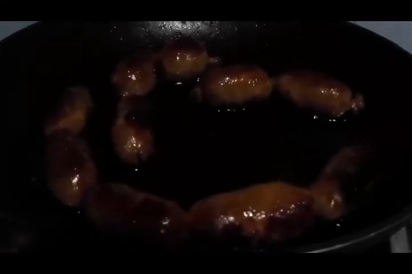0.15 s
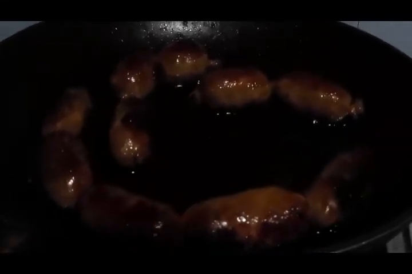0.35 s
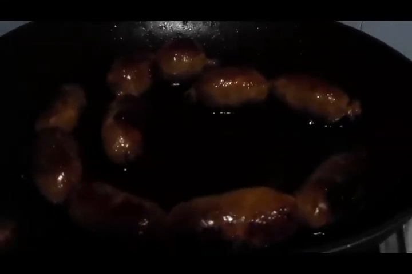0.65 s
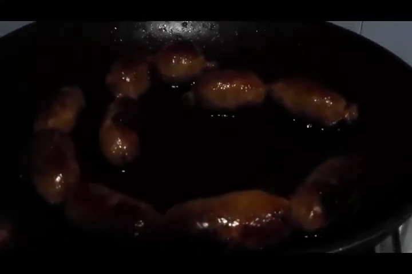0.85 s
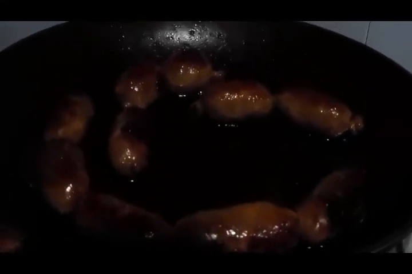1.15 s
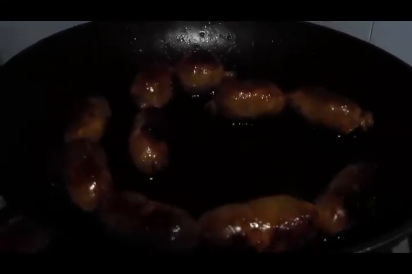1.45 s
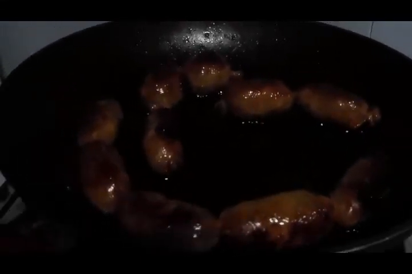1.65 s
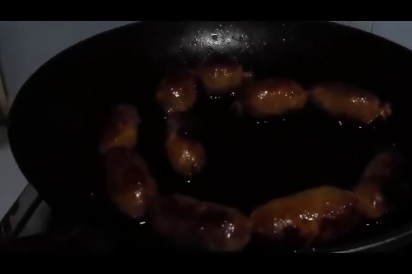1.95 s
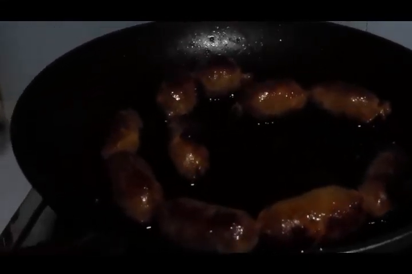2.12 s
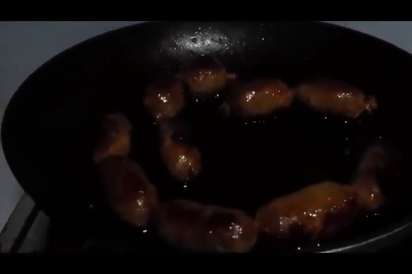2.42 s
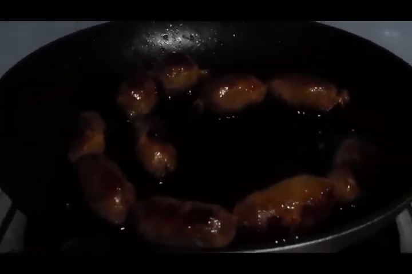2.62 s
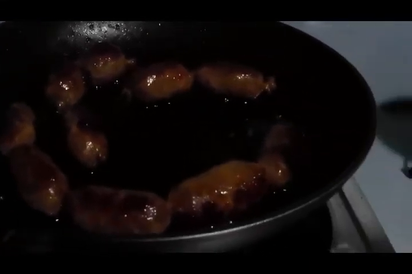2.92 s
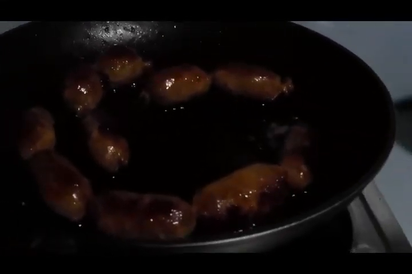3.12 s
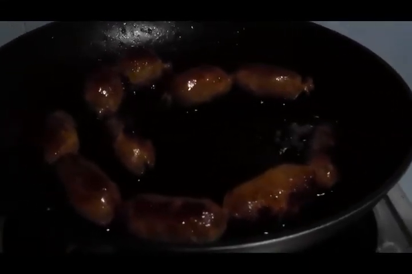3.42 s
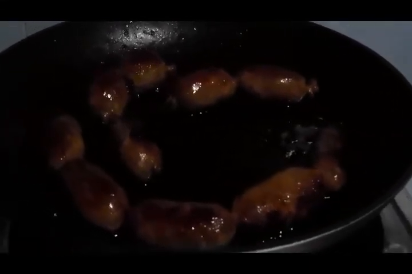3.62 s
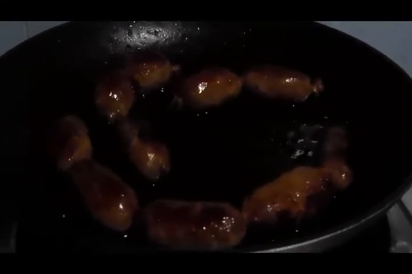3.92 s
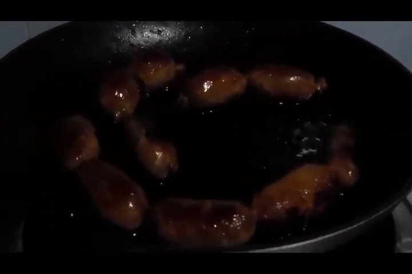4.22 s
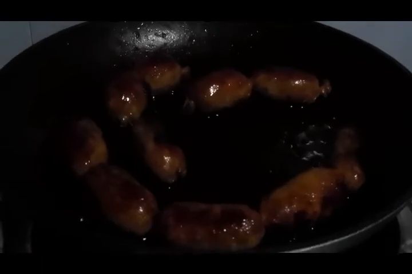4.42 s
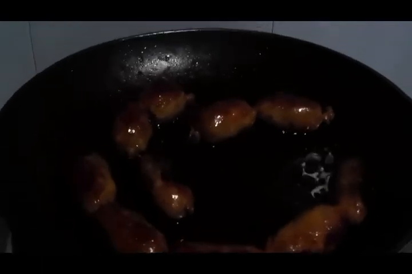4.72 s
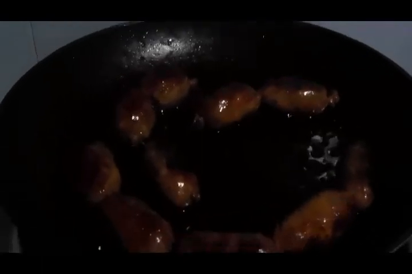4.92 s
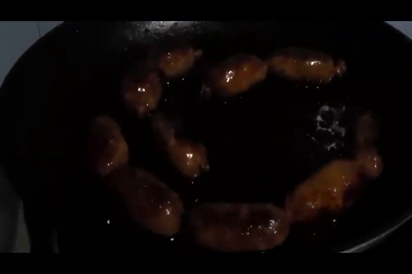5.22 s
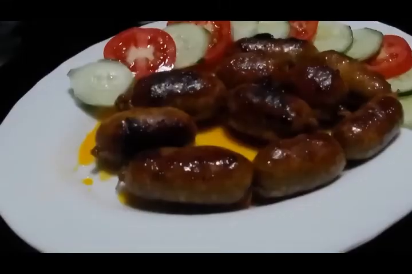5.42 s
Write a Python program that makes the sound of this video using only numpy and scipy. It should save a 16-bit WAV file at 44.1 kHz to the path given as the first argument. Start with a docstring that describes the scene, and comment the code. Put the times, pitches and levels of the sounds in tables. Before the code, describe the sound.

Close, bright frying sizzle with snapping fat and a few dull bumps, stopping dead near the end and leaving only faint room noise.

```python
"""Close to a camera microphone in a small tiled kitchen, sausages fry from the start in a film of fat.
Steam bubbles burst as sharp pops, lesser pops, dense crackle and fine fizz; a few big ones plop; a burner rushes.
Dull bumps and scuffs sound nearby in the first second, and again from about 3 to 5 s. They are shaped noise.
At 5.3 s the frying, the bumps and the burner stop at once, leaving only the quiet room, a hush of coloured noise."""
import sys
import numpy as np
from scipy import signal
from scipy.fft import rfft, irfft, next_fast_len
from scipy.io import wavfile
from scipy.ndimage import map_coordinates

SR = 44100
rng = np.random.default_rng(int(sys.argv[2]) if len(sys.argv) > 2 else 0)


def dump_mix(stems):
    """Bounce the given channels to the path in sys.argv[1] as a 16-bit WAV at rate SR."""
    frames = np.atleast_2d(stems).T  # one column per channel
    limited = np.clip(frames, -1, 1)  # hard clip at full scale
    pcm = np.round(limited * 32767).astype(np.int16)
    wavfile.write(sys.argv[1], SR, pcm)


N = 245195
STOP_S = 5.319  # all but the room's hush ends here

# How hard the fat boils, before the random flicker: start_s, coarse_bubbles_db, fine_spray_db
BOIL = [(0.0, -54.5, -55.5), (0.81, -49, -57.5), (1.08, -55.5, -57.5), (1.39, -52, -57),
        (1.71, -51.5, -53.5), (2.64, -51.5, -55), (2.94, -53, -53), (3.15, -49.5, -54.5),
        (3.31, -53, -59.5), (3.87, -53.5, -58.5), (4.25, -50.5, -56.5), (4.63, -53.5, -58),
        (4.94, -50.5, -59), (5.13, -52.5, -60), (5.17, -54.5, -54), (5.26, -49, -55.5)]
# Colour of the coarse crackle: frequency_hz, level_db
CRACKLE_COLOUR = [(300, -30), (700, -2), (1500, -12.5), (2200, -13), (3600, -8.5), (4500, 1), (6000, 4.5),
                  (7400, 7), (8500, 1), (11000, 6.5), (16000, -69)]
# Colour of the fine spray: frequency_hz, level_db
SPRAY_COLOUR = [(2000, -31), (5000, -23), (7400, -14), (8800, -17.5), (10500, -9.5), (11500, -12),
                (13000, -18.5), (15500, -20.5)]

# The loudest bursts, before filtering and the room: start_s, snap_peak_db, snap_pitch_hz, tail_db
# (tail_db is the common level that the ring and the spatter are set against)
LOUD_POPS = [(.0906, -22, 6700, -48), (.211, -16, 5900, -39), (.3798, -32.5, 4170, -46),
             (.4337, -26, 5640, -39), (.4536, -30, 9890, -35.5), (.6434, -20, 9800, -53),
             (.9163, -26.5, 7500, -37), (1.036, -27, 9450, -31), (1.0939, -19.5, 9200, -34.5),
             (1.4747, -25.5, 5200, -37), (1.6777, -29, 4870, -34), (1.6808, -25, 4230, -37),
             (1.6936, -32, 2730, -41), (1.7055, -35, 5430, -34.5), (1.825, -17, 8800, -35),
             (1.9231, -23.5, 6100, -33), (2.0623, -31, 3940, -37), (2.104, -29.5, 4370, -42),
             (2.4195, -28, 4660, -40), (2.4246, -17, 7800, -33.5), (2.5621, -23, 9300, -50),
             (2.5858, -30, 3450, -34), (2.802, -32, 3250, -45), (2.9024, -29, 4970, -31.5),
             (3.0422, -30, 7200, -37), (3.1087, -25, 6160, -33.5), (3.2683, -24, 5160, -41),
             (3.312, -21, 6560, -40), (3.3375, -17, 5640, -31), (3.503, -22, 6900, -41),
             (3.5098, -22, 6260, -33.5), (3.5716, -20.5, 9660, -47), (3.6844, -19.5, 10800, -43),
             (4.0897, -25.5, 4700, -49), (4.1021, -27.5, 3380, -35), (4.2215, -14.5, 8800, -41),
             (4.2936, -19.5, 11200, -52), (4.4371, -12, 10200, -28), (4.487, -25.5, 5200, -36),
             (4.5138, -19.5, 7260, -30.5), (4.599, -25, 7600, -53), (4.7529, -26.5, 4670, -35),
             (4.7743, -34.5, 4100, -34), (4.9818, -22, 4960, -36.5), (5.0558, -21, 7600, -34),
             (5.1466, -23, 8530, -36), (5.1819, -23, 5510, -33), (5.2112, -24.5, 6890, -31),
             (5.2346, -14, 10500, -32), (5.265, -25, 5870, -43)]
# Colour of the droplets spattering after a pop: frequency_hz, level_db
DROPLET_COLOUR = [(300, -33), (1500, -5.5), (4500, 4.5), (7500, -8.5), (11000, 6.0), (15000, -22)]
# The lesser pops come by chance, around these typical values
LESSER_SNAP_DB, LESSER_SNAP_SCATTER_DB = -30.5, 3
LESSER_PITCH_HZ, LESSER_PITCH_SCATTER_OCTAVES = 6890, 0.353
LESSER_TAIL_DB, LESSER_TAIL_SCATTER_DB = -43.5, 3
# Smaller, higher bubbles snap harder and ring less
SNAP_DB_PER_OCTAVE, TAIL_DB_PER_OCTAVE = 6.5, -5

# Big slow bubbles in the fat, before their onset and the room: start_s, level_db, pitch_hz, t60_s
BIG_BUBBLES = [(1.6926, -40, 1260, 0.013), (2.568, -44.5, 647, 0.053), (4.0888, -40.5, 1450, 0.052),
               (4.8892, -36.5, 1320, 0.01)]
# Colour of their puff of steam: multiple_of_pitch, level_db
PUFF_COLOUR = [(1 / 8, -36), (1 / 2, -3), (1, 0), (2, -7), (6, -35)]

# Dull bumps and scuffs nearby, before their rise and fall: start_s, level_db, rise_s, t60_s, centre_hz
CONTACTS = [(.41, -59.5, .08, 0.69, 216), (.775, -59.5, 0.046, 0.48, 300), (.926, -50, 0.013, 0.26, 570),
            (1.04, -48, 0.0068, 0.45, 475), (1.059, -49, 0.008, 0.28, 298), (3.09, -66, 0.015, 0.53, 252),
            (3.96, -64, 0.023, 1, 272), (4.501, -58.5, 0.0088, 0.18, 400), (4.86, -56.5, 0.1, 0.67, 815)]
# Colour of a bump: multiple_of_centre, level_db
CONTACT_COLOUR = [(.08, -32), (.25, -14), (.55, -2), (1, -1.5), (1.6, -2), (3, -9.5), (6, -12), (20, -61)]
# Resonances of stove and room: centre_hz, width_hz, gain_db
STOVE_RESONANCES = [(304, 16, 10.5), (417, 41, 6.5), (581, 27, 5), (1135, 12, 9)]
# Colour of the burner: frequency_hz, level_db
BURNER_COLOUR = [(40, -20), (110, -10.5), (200, -12), (300, -7.0),
                 (600, -3.5), (1200, -6), (3000, -5.5), (10000, -63)]

# Decay of the room tail: frequency_hz, t60_s
ROOM_DECAY = [(300, 0.22), (3000, 0.34), (8000, 0.14), (15000, 0.013)]
# Colour of the room by itself: frequency_hz, level_db
ROOM_COLOUR = [(25, -29), (60, -27), (85, -9.5), (110, -2.5), (160, -4.5), (280, -0.5), (700, 0),
               (1150, -1), (2000, -3.5), (5000, -8.5), (11000, -14.5), (15500, -14)]
# Response of the camera's microphone: frequency_hz, gain_db
MICROPHONE = [(1000, -1), (11000, -0.5), (13000, 1), (15500, -1.5)]
MICROPHONE_TOP_HZ = 15900


def amp(db):
    """Decibels to gain."""
    return 10 ** (np.asarray(db) / 20)


def unit(x):
    """Scale to rms 1."""
    return x / np.sqrt(np.mean(x ** 2) + 1e-20)


def along(points, hz):
    """Read (frequency, value) points on a log frequency axis."""
    f, v = np.transpose(points)
    return np.interp(np.log(hz + 1), np.log(f + 1), v)


def wobble(rate):
    """A smooth random curve of rms 1, with rate knots a second."""
    knots = rng.standard_normal(N // 50)
    return unit(map_coordinates(knots, [np.arange(N) * rate / SR]))


def filtered(x, response):
    """Shape x by a response given as a function of frequency in Hz."""
    size = next_fast_len(len(x) + 8192)
    spectrum = rfft(x, size) * response(np.fft.rfftfreq(size, 1 / SR))
    return irfft(spectrum, size)[:len(x)]


def coloured(x, spectrum):
    """Give x a (frequency_hz, level_db) colour, at rms 1."""
    return unit(filtered(x, lambda hz: amp(along(spectrum, hz))))


def place(times, sounds):
    """Sum rows of sound, each starting at its time in seconds."""
    first = np.round(np.abs(times) * SR).astype(int).reshape(-1, 1)
    index = first + np.arange(sounds.shape[1])
    return np.bincount(index.ravel(), sounds.ravel(), N)[:N]


def swell(u):
    """A quick rise to 1 at u = 1, then an exponential fall."""
    return u * np.exp(1 - u)


def sizzle():
    """Coarse crackle and fine spray, each over a hiss of countless smaller bubbles, in uneven spurts."""
    s, coarse_db, fine_db = np.transpose(BOIL)
    t = np.arange(N) / SR
    crackle = unit(bursts(count=4000, centre_hz=4140, spread=0.98, cycles=0.46, range_db=35.5))
    spray = unit(bursts(count=5000, centre_hz=9890, spread=0.42, cycles=0.96, range_db=32.0))
    crackle_and_hiss = crackle + amp(-9.5) * rng.standard_normal(N)
    spray_and_hiss = spray + amp(-5.5) * rng.standard_normal(N)
    coarse_gain = amp(np.interp(t, s, coarse_db) + 0.72 * wobble(30.3))
    fine_gain = amp(np.interp(t, s, fine_db) + 0.56 * wobble(30))
    coarse = coloured(crackle_and_hiss, CRACKLE_COLOUR) * coarse_gain
    fine = coloured(spray_and_hiss, SPRAY_COLOUR) * fine_gain
    spurt_db = .9 * wobble(45) + .7 * wobble(140)
    return (coarse + fine) * amp(spurt_db)


def bursts(count, centre_hz, spread, cycles, range_db):
    """Tiny bubbles burst at random: most are faint, some ring longer, each throws a droplet just after."""
    when, size, pitch, life, lag = rng.random((count, 5)).T[:, :, None]
    t = np.arange(SR // 200) / SR
    # spread is in octaves either side of the centre
    hz = np.clip(centre_hz * 2 ** (spread * (2 * pitch - 1)), 300, 16000)
    # cycles from the start to the peak of a tick
    turns = cycles * 3 ** (life ** 3)
    # longer ticks are quieter
    gain = amp(-range_db * np.maximum(size, .035) ** .5) / np.sqrt(turns)
    tone = np.sin(2 * np.pi * (hz * t + rng.random((count, 1))))
    ticks = gain * swell(t * hz / turns) * tone
    start = when * N / SR
    droplet_start = start + .0003 + 0.0022 * lag
    return place(start, ticks) + amp(-6) * place(droplet_start, ticks)


def pops(snap_cycles=0.7, ring_t60=0.0077, ring_db=3, spatter_db=-2, spatter_t60=0.014,
         low_hz=700, high_hz=14000):
    """A bubble's skin snaps; its open cavity rings briefly, rising in pitch, while droplets spatter."""
    s, snap_db, snap_hz, tail_db = np.vstack([LOUD_POPS, lesser_pops()]).T[:, :, None]
    t = np.arange(SR // 30) / SR
    snap_shape = swell(t * snap_hz / snap_cycles) ** 1.5
    snap = amp(snap_db) * snap_shape * np.sin(2 * np.pi * snap_hz * t)
    ring_hz = .95 * snap_hz  # a cavity starts to ring a little lower than its snap
    glide = t * (1 + 6 * t)
    ring_tone = np.sin(2 * np.pi * (ring_hz * glide + rng.random(s.shape)))
    ring = amp(ring_db - 60 * t / ring_t60) * ring_tone
    droplets = coloured(rng.standard_normal(len(s) * len(t)), DROPLET_COLOUR)
    spatter = amp(spatter_db - 60 * t / spatter_t60) * droplets.reshape(len(s), -1)
    onset = 1 - np.exp(-t / 0.00018)
    sound = place(s, snap + amp(tail_db) * (ring + spatter) * onset)

    def radiation(hz):
        """So small a source radiates little bass, and the thick fat softens the sharpest edge."""
        return (1j * hz / (low_hz + 1j * hz)) ** 2 / (1 + (hz / high_hz) ** 10)

    return filtered(sound, radiation)


def lesser_pops(count=125):
    """Rows like LOUD_POPS, scattered through the frying, stronger where the fat boils harder."""
    s, coarse_db, _ = np.transpose(BOIL)
    when = rng.random(count) * STOP_S
    size, pitch, tail = rng.triangular(-2.2, 0, 2.2, (count, 3)).T
    octaves = LESSER_PITCH_SCATTER_OCTAVES * pitch
    boil_db = np.interp(when, s, coarse_db - coarse_db.mean())
    snap_db = LESSER_SNAP_DB + boil_db + LESSER_SNAP_SCATTER_DB * size + SNAP_DB_PER_OCTAVE * octaves
    tail_db = LESSER_TAIL_DB + boil_db + LESSER_TAIL_SCATTER_DB * tail + TAIL_DB_PER_OCTAVE * octaves
    return np.column_stack([when, snap_db, LESSER_PITCH_HZ * 2 ** octaves, tail_db])


def plops(puff_db=-4, note_db=-9):
    """Large bubbles let out a puff of steam around a low, short note."""
    t = np.arange(SR // 10) / SR
    onset = 1 - np.exp(-t / 0.0006)
    sounds = []
    for s, db, hz, t60 in BIG_BUBBLES:
        puff_colour = [(hz * multiple, level_db) for multiple, level_db in PUFF_COLOUR]
        puff = coloured(rng.standard_normal(len(t)), puff_colour)
        note = np.sin(2 * np.pi * hz * t)
        shape = amp(db - 60 * t / t60) * onset
        sounds.append(shape * (amp(note_db) * note + amp(puff_db) * puff))
    return place(np.array(BIG_BUBBLES)[:, 0], np.array(sounds))


def kitchen(x, echo_s=.005, echo_db=-15, near_db=-13, room_db=-12):
    """The direct sound, a slap from the tiles, scatter from pan and stove, and a short room tail."""
    # four noise tails, each frequency dying at its own rate
    _, frames, z = signal.stft(rng.standard_normal((4, SR // 4)), SR, nperseg=256)
    hz = np.fft.rfftfreq(256, 1 / SR)
    decay = amp(-60 * frames / along(ROOM_DECAY, hz)[:, None])
    tails = signal.istft(z * decay, SR, nperseg=256)[1]
    t = np.arange(tails.shape[1]) / SR
    wet = np.zeros(N)
    for k, tail in enumerate(tails):
        # bubbles at different spots of the pan take different paths
        delay = echo_s * (1 + 0.088 * rng.uniform(-1.1, 1))
        near = rng.standard_normal(len(t)) * (t > delay) * amp(-60 * t / 0.038)
        room = amp(room_db) * tail / np.linalg.norm(tail)
        answer = room + amp(near_db) * near / np.linalg.norm(near)
        answer[int(delay * SR)] += amp(echo_db)
        # short slices of the sound take turns among the paths
        spot = np.arange(N) // 512 % len(tails) == k
        wet += signal.fftconvolve(x * spot, answer)[:N]
    return x + wet


def bumps(low_hz=90):
    """Soft, scuffing contacts stir the low resonances and die away in the room."""
    t = np.arange(SR // 2) / SR
    sounds = []
    for s, db, rise, t60, centre_hz in CONTACTS:
        def colour(hz):
            """Resonances under the bump's own colour, with the deepest bass removed."""
            bass_cut = hz ** 2 / (hz ** 2 + low_hz ** 2)
            return hollow(hz) * amp(along(CONTACT_COLOUR, hz / centre_hz)) * bass_cut

        shape = np.sqrt(np.minimum(t / rise, 1)) * amp(-60 * np.maximum(t - rise, 0) / t60)
        scuff = unit(filtered(rng.standard_normal(len(t)), colour))
        sounds.append(amp(db) * shape * scuff)
    return place(np.array(CONTACTS)[:, 0], np.array(sounds))


def hollow(hz):
    """A flat response with a few causal resonances of stove and room on top."""
    response = 1
    for centre, width, db in STOVE_RESONANCES:
        peak = 1j * hz * width / (centre * centre - hz * hz + 1j * hz * width)
        response = response + (amp(db) - 1) * peak
    return response


def stove():
    """The low rush of the burner under the pan: resonant noise, wavering slightly in level."""
    rush = filtered(rng.standard_normal(N), hollow)
    return amp(-70.0 + 1.4 * wobble(7.2)) * coloured(rush, BURNER_COLOUR)


def room_hush():
    """The quiet room by itself: steady coloured noise."""
    return amp(-64.5) * coloured(rng.standard_normal(N), ROOM_COLOUR)


def scene():
    """The frying, bumps and burner until they stop, over the room's own hush."""
    frying = kitchen(sizzle() + pops() + plops())
    running = np.arange(N) / SR < STOP_S
    return ((frying + bumps() + stove()) * running + room_hush())[None]


def record(dry):
    """The camera's microphone tilts the treble by a decibel or two and keeps nothing above its band limit."""
    def response(hz):
        return amp(along(MICROPHONE, hz)) * (hz < MICROPHONE_TOP_HZ)

    return filtered(dry[0], response)[None]


dry = scene()
out = record(dry)
dump_mix(out)
```